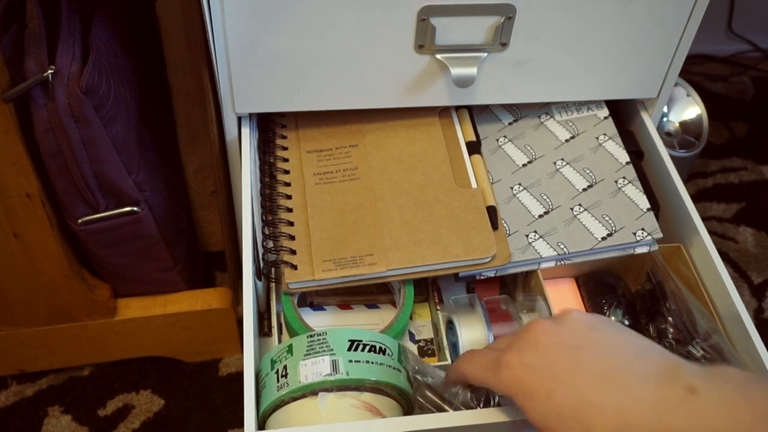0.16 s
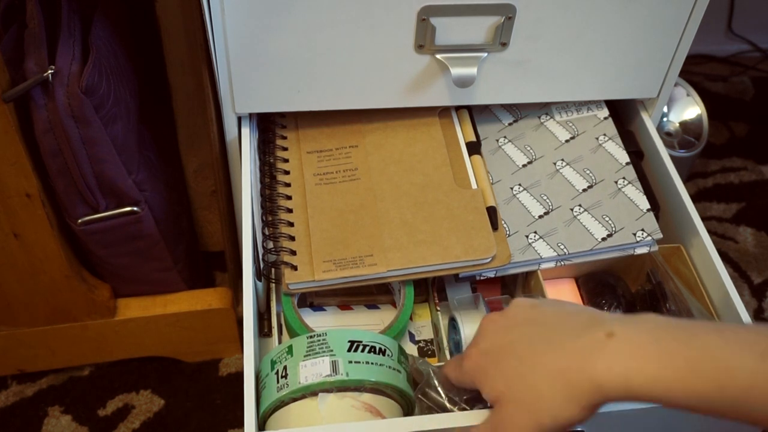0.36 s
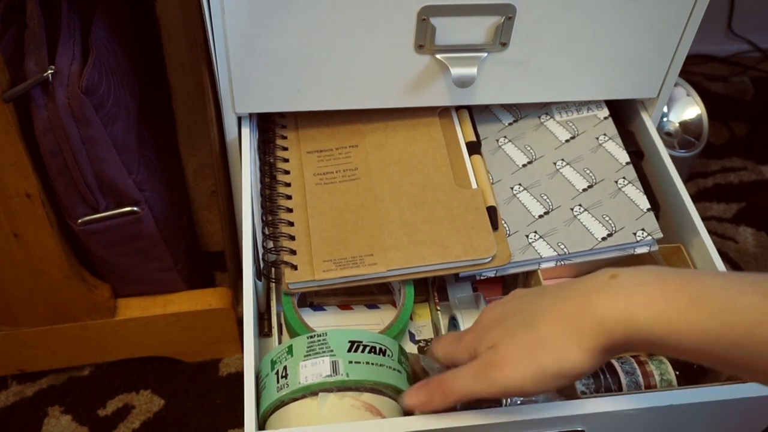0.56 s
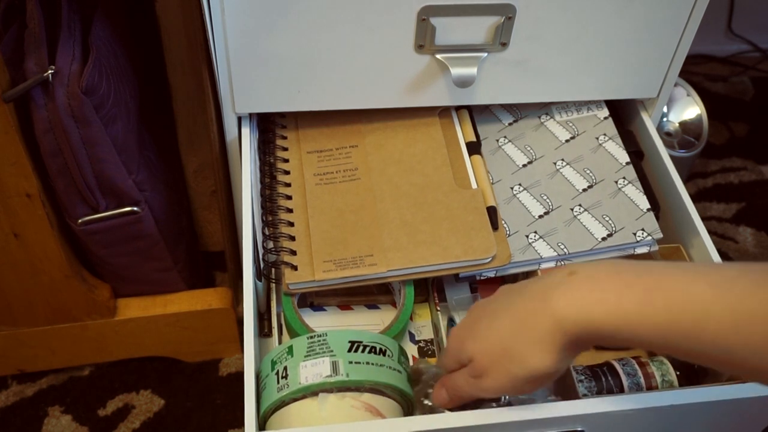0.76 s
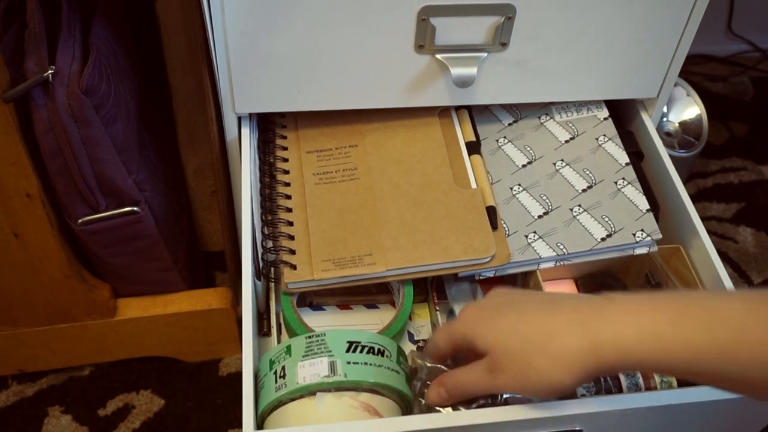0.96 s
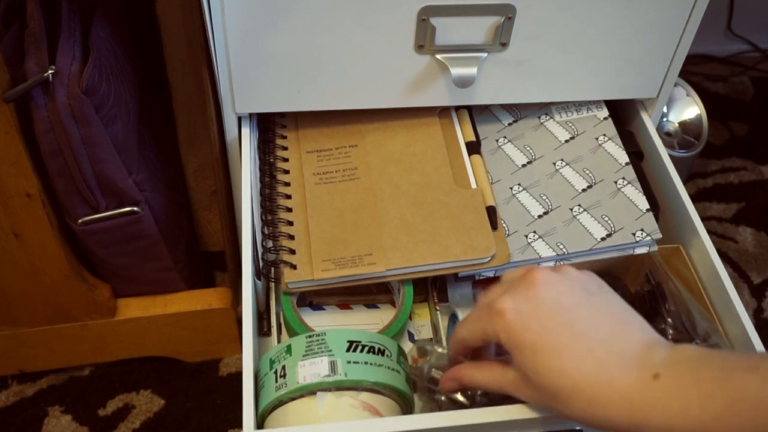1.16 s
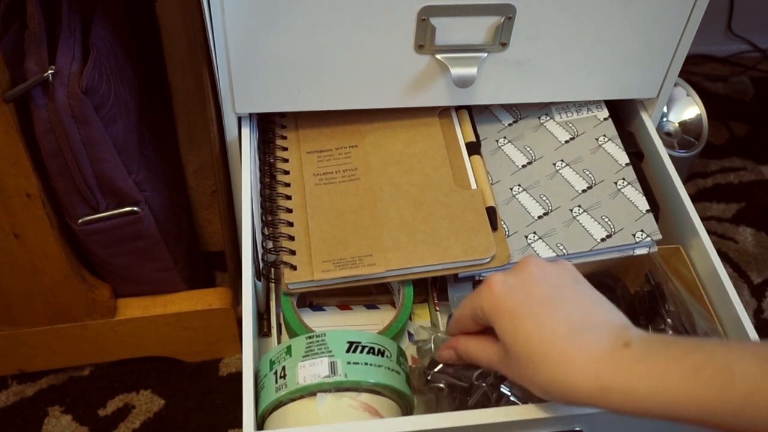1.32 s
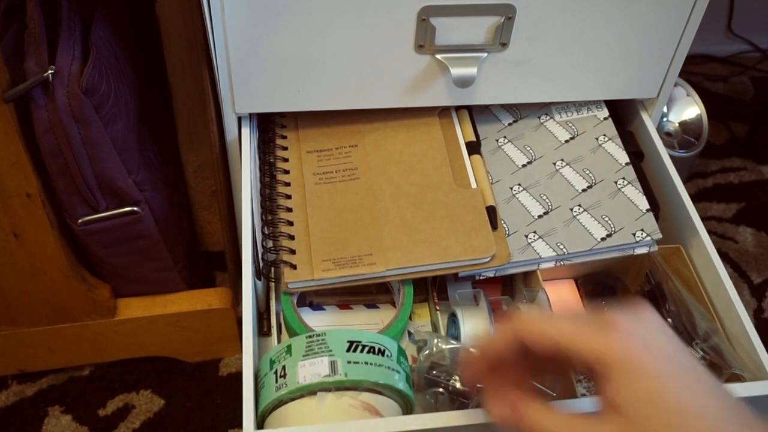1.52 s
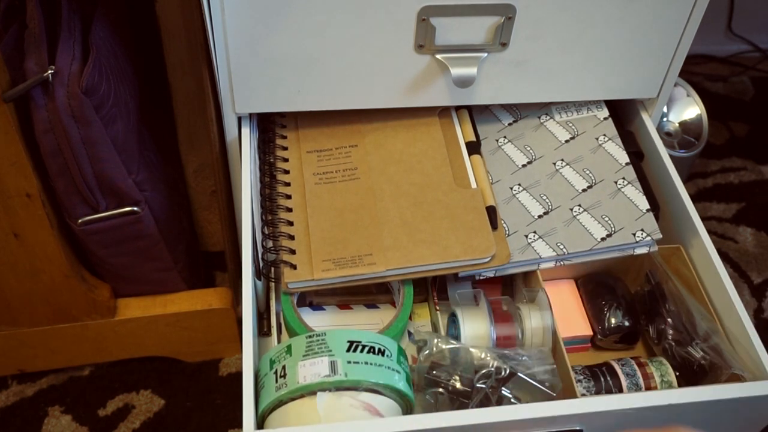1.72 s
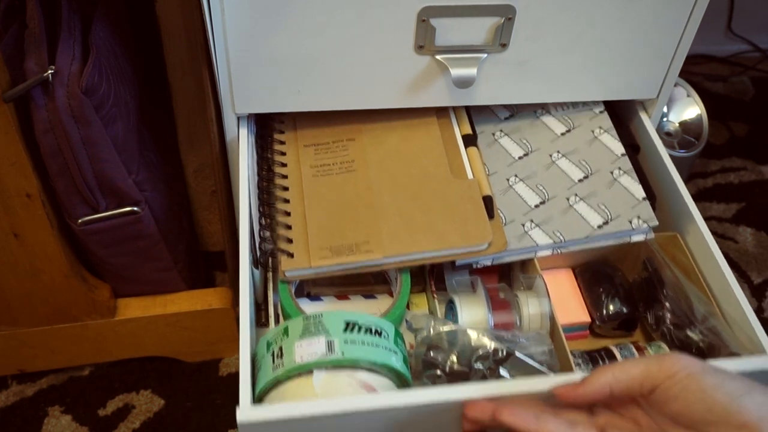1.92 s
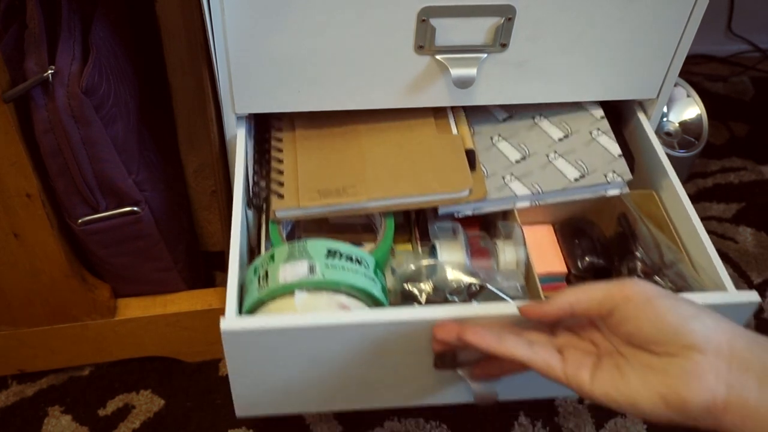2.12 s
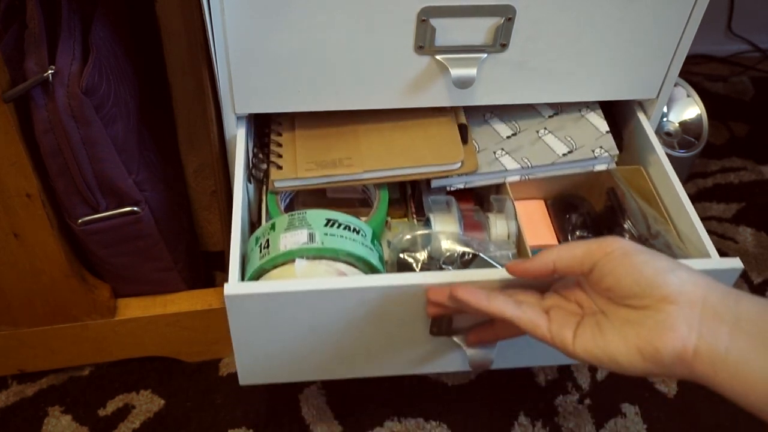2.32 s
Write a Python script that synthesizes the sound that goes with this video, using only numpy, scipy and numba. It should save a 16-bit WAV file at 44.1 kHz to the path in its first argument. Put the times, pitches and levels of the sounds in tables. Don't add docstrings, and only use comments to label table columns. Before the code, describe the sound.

Plastic film crinkles sharply from the start, with dense bright snaps and tiny crackles as fingers dig in a bag, small rolls knocking dully on wood. It thins around 1.5 seconds and stops by 1.7. Faint ticks follow, then from about 2.0 the drawer rumbles and grinds on its runners, with a hollow wooden bump near 2.2, fading out. Close microphone, quiet room, short echoes.

```python
import sys
import numpy as np
from scipy import signal
from scipy.fft import rfft, irfft
from scipy.io import wavfile
from scipy.ndimage import uniform_filter1d
from numba import njit

SR = 44100
rng = np.random.default_rng(int(sys.argv[2]) if len(sys.argv) > 2 else 0)


def generate_wav(signal):
    frames = np.transpose(np.atleast_2d(signal))
    scaled = np.clip(frames, -1, 1) * 32767
    pcm = np.round(scaled).astype(np.int16)
    wavfile.write(sys.argv[1], SR, pcm)


def rack_gain(trim_db):
    fader = np.asarray(trim_db, float)
    return 10 ** (fader / 20)


N = 104958
TIME_S = np.arange(N) / SR
LET_GO_S = 1.68

# time_s, crinkle_db
EFFORT = [(0, -41), (.09, -41.5), (.21, -46), (.29, -43.5), (.32, -34), (.45, -43.5), (.56, -44.5),
          (.63, -40.5), (.68, -42.5), (.75, -39), (.82, -50.5), (.92, -35), (1.005, -48.5), (1.12, -38.5),
          (1.27, -42), (1.33, -39.5), (1.46, -42.5), (1.56, -54)]
# pitch_hz, level_db, fade_s (time to fall 60 dB)
BODY = [(108, 0.5, 0.18), (156, -5, 0.152), (176.5, 1.5, 0.13), (211, -15, 0.085), (309, -1, 0.118),
        (362, 4.5, 0.12), (489, 0.5, 0.055), (556, -3, 0.053), (752, 2, 0.075), (930, 6.5, 0.068),
        (1158, 16, 0.039), (1400, 7, 0.064)]


def noise():
    return rng.standard_normal(N)


def unit(x):
    return x / np.sqrt(np.mean(x ** 2))


def high(x, hz, order):
    return signal.sosfilt(signal.butter(order, hz, "high", fs=SR, output="sos"), x)


def colour(x, points):
    point_hz, point_db = np.array(points).T
    f = np.maximum(np.arange(N // 2 + 1) * SR / N, 1)
    gain_db = np.interp(np.log(f), np.log(point_hz), point_db)
    return irfft(rfft(x) * rack_gain(gain_db), N)


def curve(table):
    time_s, level_db = np.array(table).T
    before_db = level_db[0] - 60 * (time_s[0] > 0)
    return np.interp(TIME_S, time_s, level_db, left=before_db, right=level_db[-1])


def walk(rate):
    hold = int(SR / rate)
    steps = np.repeat(rng.standard_normal(N // hold + 1), hold)
    return unit(uniform_filter1d(steps, hold // 2 + 1)[:N])


@njit
def grains(out, start, hz, t60, size, sr):
    y = out.copy()
    for g in range(len(start)):
        first = int(start[g] * sr)
        length = int(t60[g] * sr) + 2
        turn = np.exp(2j * np.pi * hz[g] / sr - np.log(1000.) / length)
        z = size[g] + 0j
        for k in range(max(first, 0), min(first + length, len(y))):
            z *= turn
            y[k] += z.imag
    return y


def ring(start, hz, t60, size):
    settings = np.broadcast_arrays(start, np.clip(hz, 40, .45 * SR), t60, size)
    return grains(np.zeros(N), *[np.ravel(v) * 1. for v in settings], 1. * SR)


def snaps(table, count=70):
    start_s, peak_db, hz, treble_db = np.array(table).T[:, :, None]
    peak_db = peak_db - 11
    fade_s = .004
    u = rng.random((len(table), count, 3))
    f = 600 + 15300 * ((np.arange(count) + u[..., 0]) / count) ** 1.474
    tilt = np.clip(np.log2(f / 4000), 0, 1) * (treble_db + 9)
    tilt -= 8 * np.clip(np.log2(hz / f), 0, 3)
    tilt -= 3 * np.clip(np.log2(f / hz), 0, 1)
    tilt -= 4 * np.clip(np.log2(f / 8000), 0, 1)
    tilt += 1.5 * np.cos(2 * np.pi * np.log2(f / hz) / (1 + u[:, :1, 2]))
    late_s = -.0012 * np.log(1 - u[..., 1])
    sign = np.sign(u[..., 2] - .5)
    spray = ring(start_s + late_s, f, fade_s * (4000 / f) ** .5, rack_gain(peak_db + tilt) * sign)
    note = ring(start_s + np.array([0, .001]), hz, 2 * fade_s, rack_gain(peak_db - 4))
    return spray + note


def film_snaps():
    bag_snaps = [(0.0214, -15, 4540, -10), (0.0473, -24, 2950, -22), (0.0707, -8.5, 4730, -17.5),
                 (0.1321, -50, 2200, -10), (0.156, -17.5, 2730, -3), (0.2299, -29, 2310, -25),
                 (0.2438, -18.5, 3750, -14), (0.2598, -19.5, 2240, -14.5), (0.3002, -17.5, 2260, -14),
                 (0.3142, -15.5, 4570, -4.5), (0.3386, -26, 8360, -6.5), (0.3476, -16, 2470, -7),
                 (0.3985, -12.5, 4150, -9), (0.4106, -20, 2800, -1), (0.4479, -16, 4780, -10.5),
                 (0.4658, -16, 2420, -17), (0.4813, -11, 3000, -23), (0.5157, -12, 4070, -17),
                 (0.5975, -10.5, 3500, -16.5), (0.6155, -11.5, 4430, -25), (0.6305, -13, 2300, -5),
                 (0.7058, -24, 3810, -8), (0.7417, -22, 2400, 2.5), (0.7851, -15.5, 3240, -3),
                 (0.838, -20.5, 2480, -11.5), (0.8586, -21.5, 2310, -15), (0.8661, -13.5, 5370, -16),
                  (0.8818, -17, 1970, -5.5), (0.9077, -10, 3330, -9.5), (1.0258, -18.5, 3400, -10.5),
                  (1.0715, -19.5, 2340, -31.5), (1.078, -14.5, 2580, -17), (1.0997, -27, 6800, 0),
                  (1.1124, -16.5, 3060, -10.5), (1.1198, -11.5, 4440, -14), (1.17, -16, 4900, -16.5),
                  (1.1899, -7, 3300, -10.5), (1.2348, -17, 2700, -11), (1.284, -21, 9400, 1),
                  (1.292, -12.5, 4420, -12), (1.3159, -13.5, 2980, -22), (1.3545, -24, 1750, -3.5),
                  (1.3664, -18, 5000, -20.5), (1.4121, -23.5, 2220, -0.5), (1.4423, -11, 2450, -16.5),
                  (1.4612, -9.5, 6660, -16.5), (1.501, -22, 2750, -16.5), (1.58, -20, 3710, -7.5),
                  (1.5904, -32.5, 3970, -20), (1.6259, -29, 2320, -13.5),
                 (.0044, -17.5, 2230, -39), (.0618, -18, 2910, -19), (.0795, -19.5, 4760, -10.5),
               (.1527, -32, 2690, 0), (.1654, -22, 2440, -8.5), (.2859, -20, 1490, -25),
               (.3035, -19, 1800, -12), (.3095, -21, 4000, -5), (.3168, -13.5, 2300, -10),
               (.3315, -23, 2430, -25), (.3415, -17.5, 9200, -3.5), (.365, -18, 4870, -12),
               (.3755, -23.5, 1400, -10), (.4368, -22.5, 2680, -10), (.5861, -20.5, 2000, -27),
               (.6841, -22.5, 1420, -25), (.7344, -19, 2480, -12), (.7463, -17, 2310, -23),
               (.7608, -19.5, 2520, -5), (.7945, -23, 3240, -5), (.874, -29.5, 1400, -13),
               (.9169, -21, 3000, -7), (.9239, -17, 2960, -4.5), (.939, -16.5, 1460, -15),
               (1.0194, -21, 2200, -7.5), (1.3198, -13, 3450, -23), (1.3268, -15, 6170, -12),
               (1.389, -23.5, 4900, -14), (1.397, -30, 3030, -30), (1.401, -28, 6700, -12),
               (1.4296, -24, 6000, -18), (1.4531, -20, 6540, -18), (1.4781, -20.5, 2920, -5),
               (1.5088, -25.5, 1900, -21), (1.5364, -35, 1390, -22)]
    ticks = [
        (1.831, -41.5, 4300, -18),
        (1.8594, -36, 2300, -14.5),
        (1.8856, -38, 2300, -15),
        (2.051, -19.5, 3770, -23),
        (2.2154, -27.5, 1500, -14.5),
    ]
    return snaps(np.vstack([bag_snaps, ticks]))


def small_snaps(count=260):
    u = rng.random((count, 4))
    start_s = (np.arange(count) + u[:, 0]) / count * 1.55
    effort_db = curve(EFFORT)[(start_s * SR).astype(int)]
    peak_db = effort_db + 11.5 + 12 * (u[:, 1] - .5)
    return snaps(np.c_[start_s, peak_db, 700 * 9. ** u[:, 2], -27 + 20 * u[:, 3]], count=24)


def crinkle(count=16000):
    # pitch_hz, level_db (per Hz)
    film_tone = [(120, -38), (255, -16.5), (380, 4.5), (558, 0.5), (3020, -3), (13300, -11.5),
                 (16000, -48.5)]
    u = rng.random((count, 3))
    start_s = u[:, 0] * LET_GO_S
    f = 250 * 58.0 ** (u[:, 1] ** 0.61)
    clump = rack_gain(3.5 * np.clip(walk(250), -2, 2) + 2 * walk(39.62))
    size = rack_gain(-3 * np.log(1 - .98 * u[:, 2]))
    size = size * clump[(start_s * SR).astype(int)] * (f / 3000) ** 0.85
    tiny_creases = ring(start_s, f, 3.9 / f, size)
    film = unit(colour(tiny_creases, film_tone))
    rustle = rack_gain(-7) * unit(colour(noise(), film_tone))
    let_go = np.clip((LET_GO_S - TIME_S) * 10, 0, 1)
    return (film + rustle) * rack_gain(curve(EFFORT) - 2) * let_go


def knocks():
    # start_s, peak_db, ring_hz
    roll_hits = [(0.02, -23, 1010), (0.05, -24, 587), (0.096, -28.5, 376), (0.132, -22, 864),
                 (0.155, -25.5, 440), (0.23, -30.5, 960), (0.259, -25.5, 419), (0.284, -31, 1090),
                 (0.302, -29, 1210), (0.375, -27, 1156), (0.426, -27.5, 396), (0.481, -43, 1230),
                 (0.543, -35, 1110), (0.585, -30.5, 400), (0.596, -23.5, 1110), (0.628, -28.5, 405),
                 (0.672, -32, 293), (0.698, -27.5, 415), (0.731, -31, 425), (0.746, -29, 980),
                 (0.837, -33.5, 415), (0.881, -19, 1106), (0.881, -21, 426), (0.924, -22.5, 697),
                 (0.938, -40, 1260), (1.024, -31, 370), (1.078, -25.5, 368), (1.118, -28.5, 412),
                 (1.15, -27.5, 430), (1.188, -34.5, 977), (1.249, -29.5, 363), (1.289, -22.5, 1320),
                 (1.317, -22.5, 640), (1.4, -26.5, 400), (1.44, -36, 1150), (1.46, -20.5, 1360)]
    start_s, peak_db, hz = np.array(roll_hits).T[:, :, None]
    peak_db = peak_db - 1
    u = rng.standard_normal((len(roll_hits), 2))
    f = hz * np.array([1, 2.6]) * np.exp(np.array([0, .3]) * u[:, :1])
    roll = ring(start_s, f, 0.025 * (600 / f) ** 0.53, rack_gain(peak_db + np.array([0, -23])))
    floor = ring(start_s, 385 * np.exp(0.071 * u[:, 1:]), 0.036, rack_gain(peak_db - 21))
    return roll + floor


def drawer_bumps():
    # start_s, level_db, most_struck_tone_hz
    bump_hits = [(1.805, -56, 930), (1.856, -39, 351), (1.904, -51, 368), (2.021, -28.5, 164),
                 (2.044, -27, 175), (2.057, -23, 125), (2.099, -21.5, 490), (2.136, -29.5, 200),
                 (2.194, -32, 995), (2.196, -18.5, 360), (2.208, -11.5, 108), (2.219, -17.5, 416),
                 (2.243, -35.5, 346), (2.258, -22.5, 153), (2.337, -48, 300)]
    hz, body_db, fade_s = np.array(BODY).T
    start_s, hit_db, struck_hz = np.array(bump_hits).T[:, :, None]
    focus_db = -19 * np.abs(np.log2(hz / struck_hz))
    rings = ring(start_s, hz, fade_s, rack_gain(hit_db + body_db + focus_db))
    push = np.sin(np.pi * np.clip(np.arange(200) / SR / 0.00061, 0, 1)) ** 2
    return high(np.convolve(rings, push / push.sum())[:N] / 2, 92., order=4)


def shaken(roughness, response):
    return unit(signal.fftconvolve(noise() * roughness, response)[:N])


def drawer_slide():
    # time_s, level_db
    slide_speed = [
        (1.77, -89),
        (1.82, -66),
        (1.9, -57.5),
        (2.0, -52),
        (2.06, -43.5),
        (2.17, -43.5),
        (2.23, -40.5),
        (2.3, -51.5),
        (2.38, -51.5),
    ]
    # pitch_hz, level_db (per Hz)
    runner_tone = [(180, -32), (300, -1), (1060, -9.5), (1720, -15), (2930, -14), (16000, -38)]
    # pitch_hz, level_db, fade_s
    rail_modes = [(1050, 4, 0.043), (1900, -5, 0.053), (2580, -5, 0.057), (2850, -4, 0.081),
                  (3400, -19, .07)]
    hz, body_db, fade_s = np.array(BODY).T
    rumble_db = body_db - 17 * np.abs(np.log2(hz / 175))
    box = shaken(rack_gain(0.97 * walk(52)), ring(0, hz, fade_s, rack_gain(rumble_db))[:SR // 2])
    grind = unit(colour(noise() * rack_gain(1.77 * walk(100)), runner_tone))
    rail_hz, rail_db, rail_fade_s = np.array(rail_modes).T
    rail = shaken(rack_gain(3.3 * walk(150)), ring(0, rail_hz, rail_fade_s, rack_gain(rail_db))[:SR // 4])
    speed = rack_gain(curve(slide_speed))
    return high(speed * box * rack_gain(-2.5), 92., order=4) + speed * (grind + rack_gain(-9) * rail)


def tail(x, t60, db):
    t = np.arange(int(SR * t60)) / SR
    echoes = rng.standard_normal(len(t)) * rack_gain(-60 * t / t60) * np.minimum(t / 0.00037, 1)
    echoes = signal.lfilter(*signal.butter(1, 7500, fs=SR), echoes)
    echoes = echoes / np.sqrt(np.sum(echoes ** 2))
    return rack_gain(db) * signal.fftconvolve(x, echoes)[:N]


def room_tone():
    # pitch_hz, level_db (per Hz)
    quiet_tone = [(40, 8.5), (90, 2), (230, -2), (419, 2.5), (1020, -11), (2380, -13.5), (12300, -24),
                  (16000, -22)]
    return unit(colour(noise() * rack_gain(1.5 * walk(36)), quiet_tone)) * rack_gain(-65)


def scene():
    bag = high(film_snaps() + small_snaps() + crinkle() + knocks(), 268.0, order=4)
    near = bag + tail(bag, t60=0.075, db=-11) + drawer_bumps() + drawer_slide()
    room = tail(high(near, 340.0, order=1), t60=0.2, db=-14)
    return (near + room + room_tone())[None]


def roll_off(x):
    return signal.sosfilt(signal.butter(12, 16800, fs=SR, output="sos"), x)


def record(dry):
    treble_cut = signal.ellip(6, .5, 28, 15750, fs=SR, output="sos")
    x = signal.sosfilt(treble_cut, high(dry, 85., order=3))
    return roll_off(x)


dry = scene()
out = record(dry)
generate_wav(out)
```